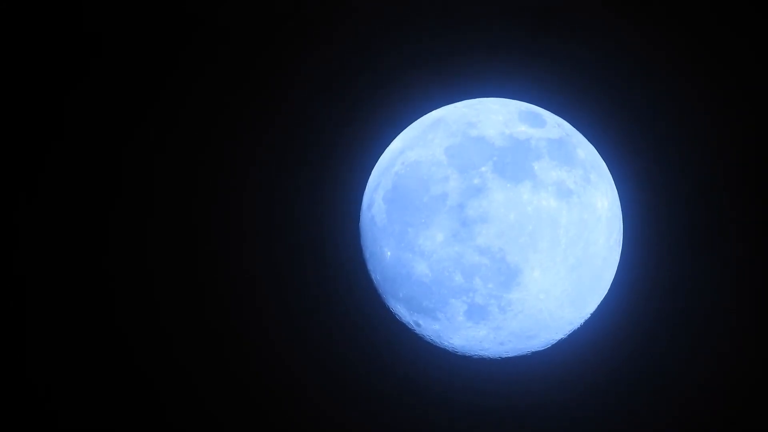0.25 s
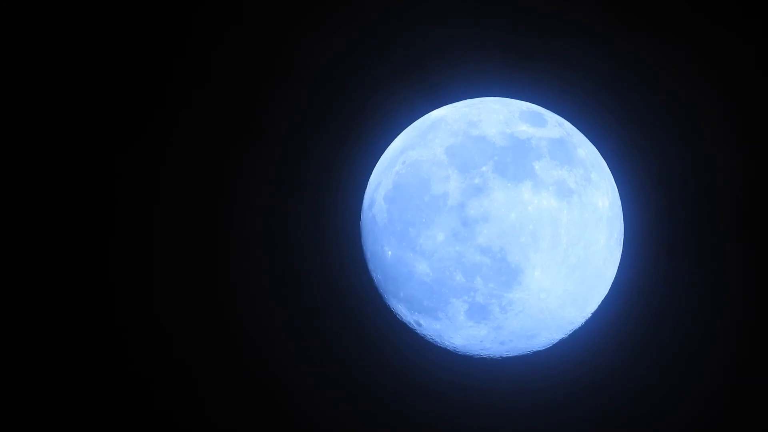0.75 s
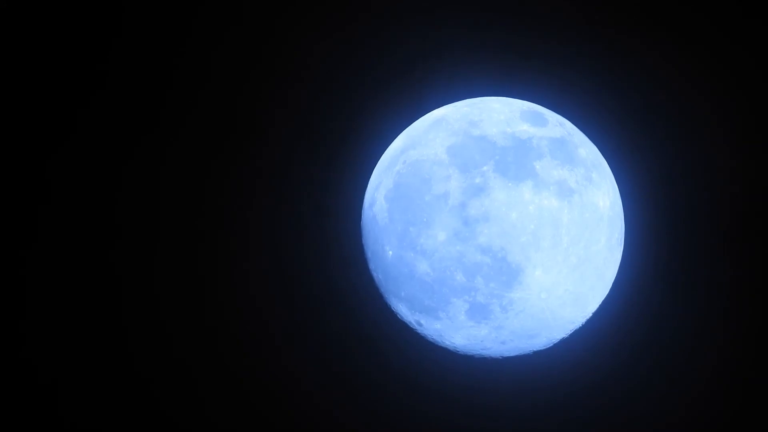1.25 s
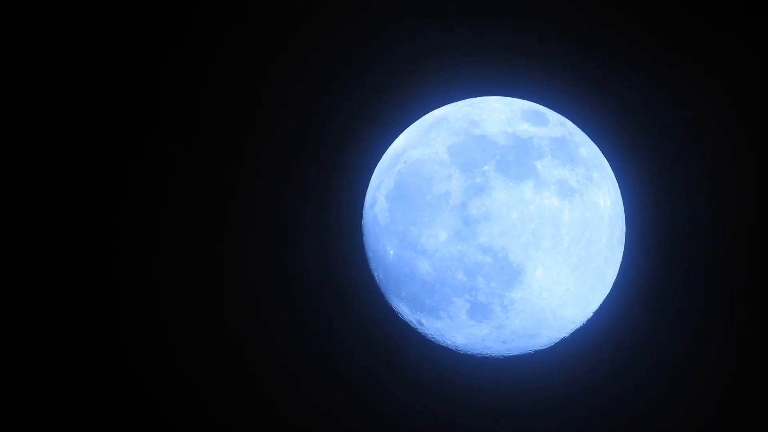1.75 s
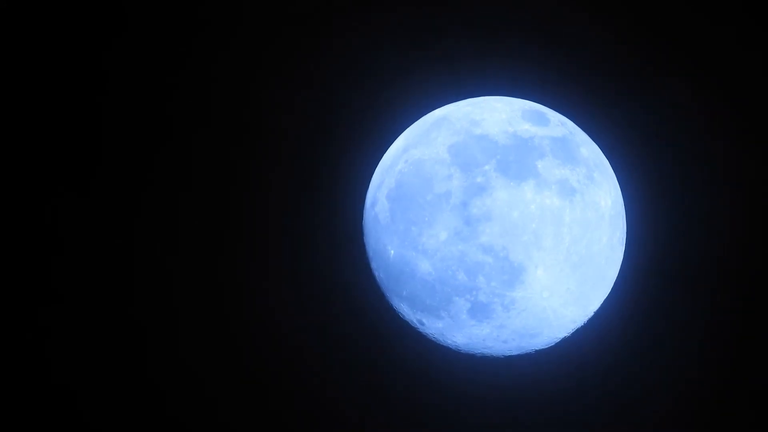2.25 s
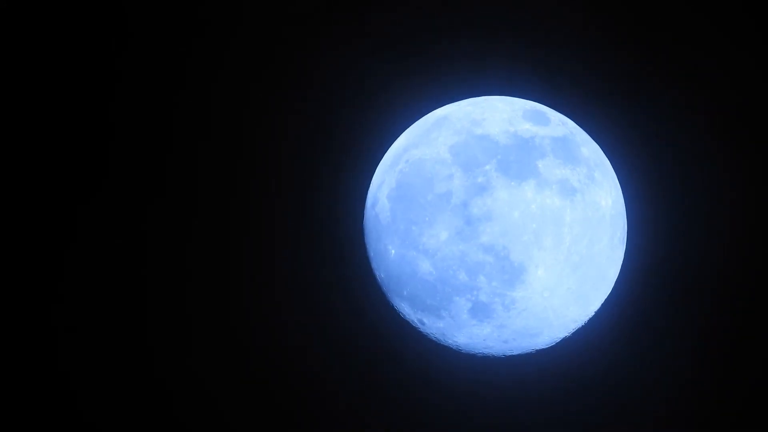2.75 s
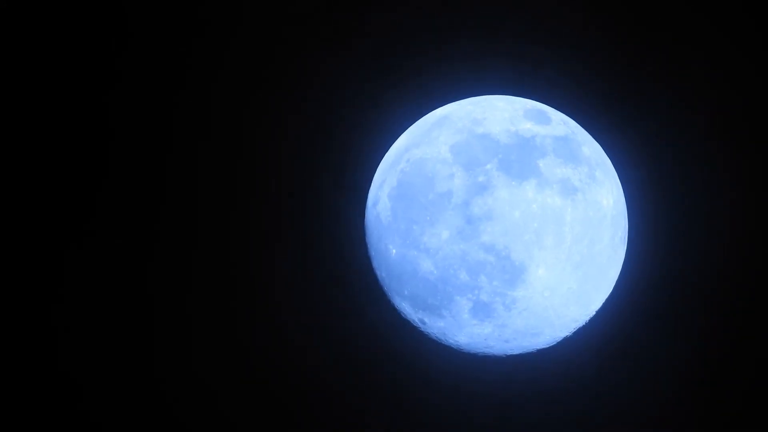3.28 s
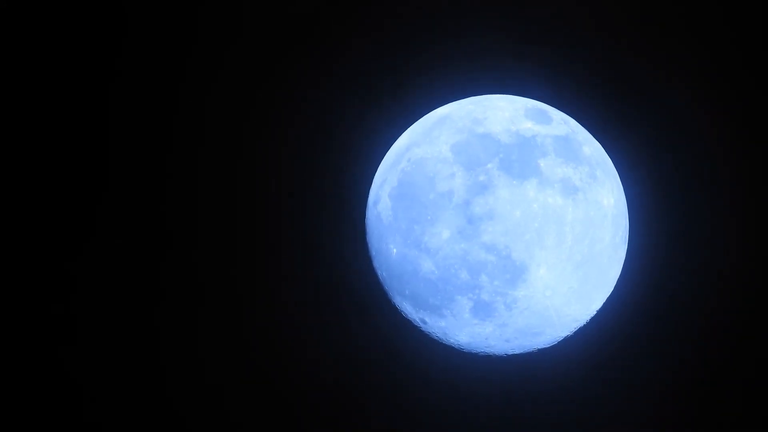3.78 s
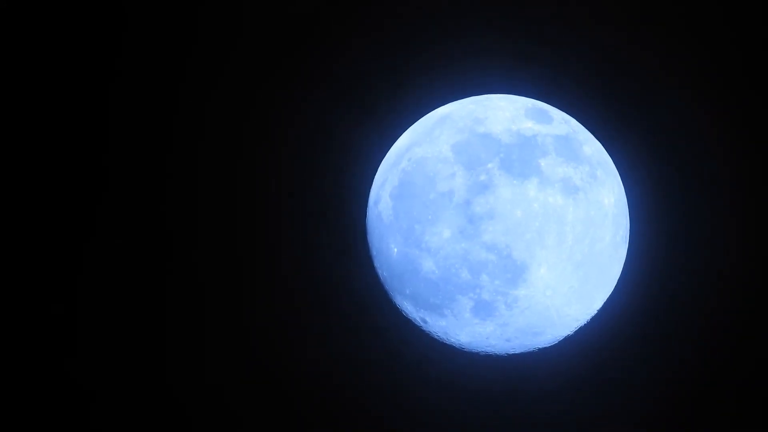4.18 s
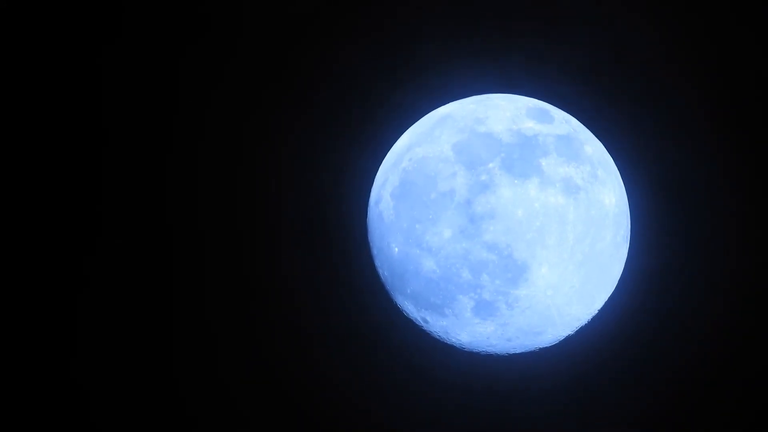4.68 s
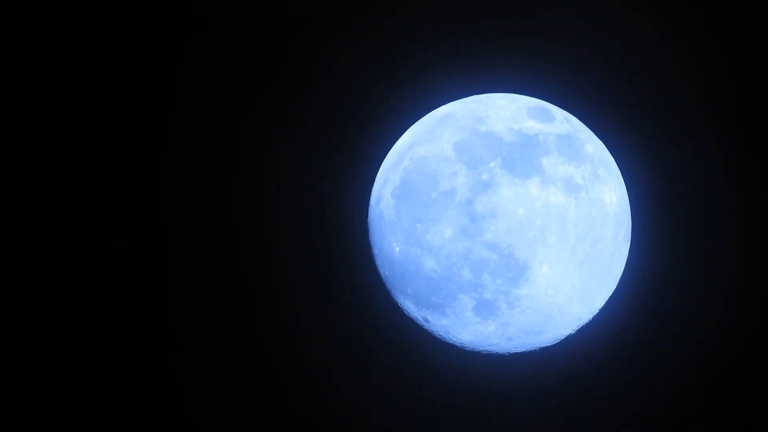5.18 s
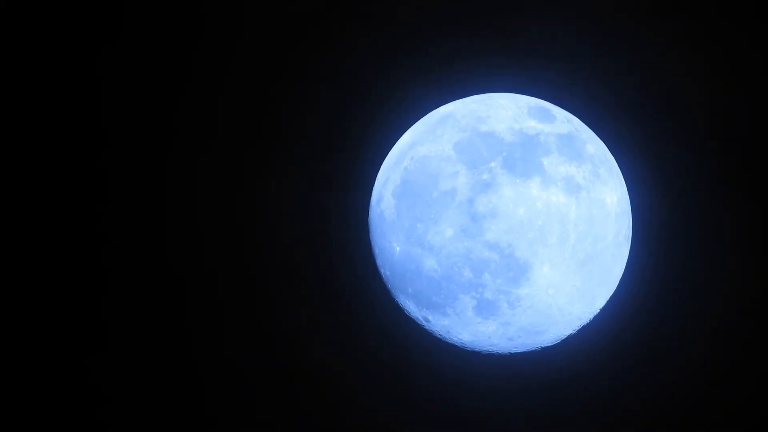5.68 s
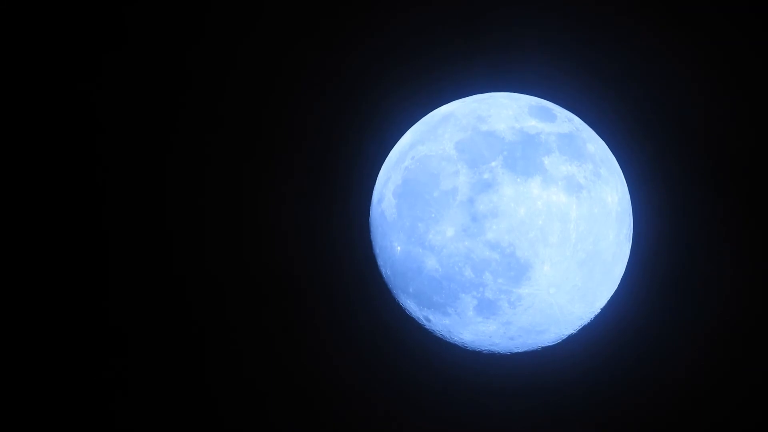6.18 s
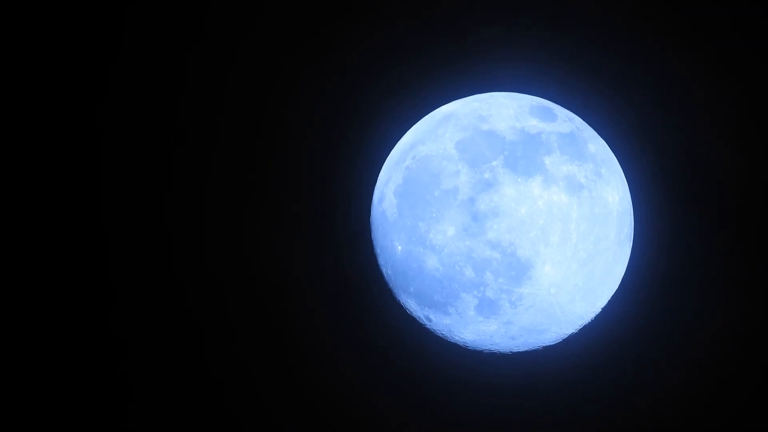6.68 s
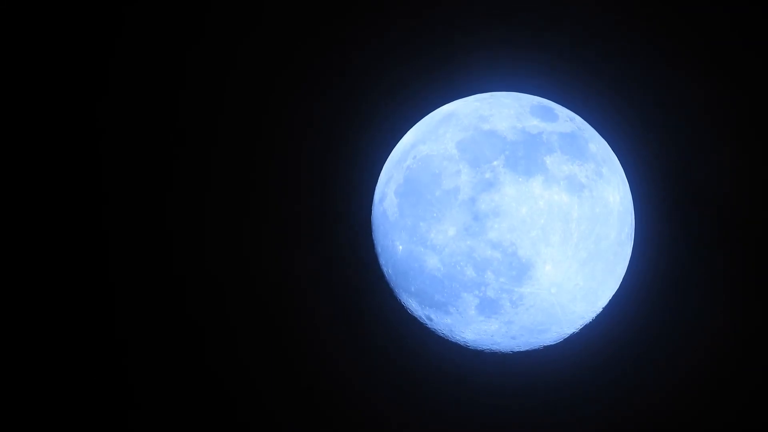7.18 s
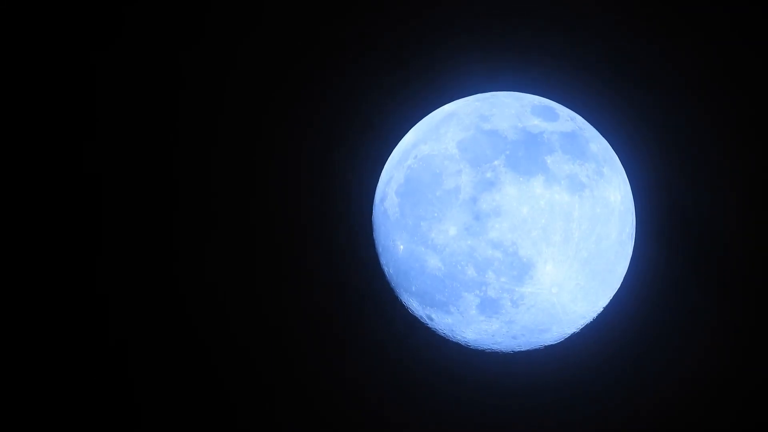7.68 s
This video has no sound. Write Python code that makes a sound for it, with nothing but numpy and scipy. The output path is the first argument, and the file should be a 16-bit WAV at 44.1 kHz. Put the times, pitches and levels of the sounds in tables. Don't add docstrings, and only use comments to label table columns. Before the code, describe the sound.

A loud, near, almost pure-toned cricket trill repeats throughout, slightly uneven in length, with faint echoes off trees. Behind it run rapid high ticks, paired chirps that pause around four seconds and again past seven, and scratchy katydid buzz that gently swells. Soft night air and far tyre hum lie underneath; the hum nearly drops away mid-way, then returns. Open field, wide stereo, very quiet surroundings.

```python
import sys
import numpy as np
from scipy import signal
from scipy.fft import rfft, irfft
from scipy.io import wavfile
from scipy.ndimage import uniform_filter1d

SR = 44100
rng = np.random.default_rng(int(sys.argv[2]) if len(sys.argv) > 2 else 0)


def undo_db(level):
    steps = np.asarray(level, float) / 20
    return 10 ** steps


def to_wav(sig):
    pcm = np.clip(np.atleast_2d(sig), -1, 1) * 32767
    pcm = np.round(pcm).astype(np.int16)
    wavfile.write(sys.argv[1], SR, pcm.T)


N = 349713


def evened(x):
    return x / np.sqrt(np.mean(x ** 2) + 1e-20)


def hiss():
    return rng.standard_normal(N)


def read(points, hz):
    f, value = np.transpose(points)
    return np.interp(np.log(hz + 1), np.log(f + 1), value)


def curve(table, column):
    rows = np.array(table)
    return np.interp(np.arange(N) / SR, rows[:, 0], rows[:, column])


def add(mix, s, sound):
    at = round(s * SR)
    part = mix[max(at, 0):max(at + len(sound), 0)]
    part += sound[max(-at, 0):][:len(part)]


def band(x, lo_hz, hi_hz):
    return signal.sosfilt(signal.butter(N=2, Wn=[lo_hz, hi_hz], btype="band", fs=SR, output="sos"), x)


def place(x, left_db, lag_ms):
    hz = np.fft.rfftfreq(N, 1 / SR)
    late = irfft(rfft(x) * np.exp(-2j * np.pi * hz * lag_ms / 1000), N)
    return np.array([x * undo_db(left_db / 2), late * undo_db(-left_db / 2)])


def resonate(x, hz, width):
    turn = np.exp(2j * np.pi * hz * np.arange(len(x)) / SR)
    r = np.exp(-np.pi * width / SR)
    smooth = signal.lfilter([1], np.poly([r, r]), x / turn)
    return evened((turn * smooth).real)


def bed(spectrum, same, left, patchy_db):
    frames, hz = N // 256 + 5, np.fft.rfftfreq(1024, 1 / SR)
    a, b, c, d, patches = rng.standard_normal((frames, 513, 5)).T
    patches = uniform_filter1d(patches, size=10, axis=0)
    patches = evened(uniform_filter1d(patches, size=20, axis=1))
    like = np.clip(read(same, hz), -1, 1)[:, None]
    shared, own = a + 1j * b, c + 1j * d
    z = np.array([shared, like * shared + np.sqrt(1 - like ** 2) * own])
    side_db = np.array([[.5], [-.5]]) * read(left, hz)
    z *= undo_db((read(spectrum, hz) + side_db)[:, :, None] + patchy_db * patches)
    return evened(signal.istft(z, nperseg=1024, noverlap=768)[1][:, :N])


def field(x, t60, wet_db):
    t = np.arange(SR // 2) / SR
    tail = rng.standard_normal((2, len(t))) * undo_db(-60 * t / t60) * np.minimum(t / 0.0014, 1)
    tail /= np.linalg.norm(tail[0])
    return undo_db(wet_db) * signal.fftconvolve(x[None], tail, axes=1)[:, :N]


# (frequency [Hz], level [dB per Hz])
AIR_COLOUR = [(30, 5.5), (60, -6.5), (120, -15), (160, -15.5), (215, 4), (270, -0.5), (340, 1), (500, -0.5),
              (900, -8), (1300, -8), (2200, -17.5), (2950, -23), (3500, -29), (4600, -47.5)]
# (frequency [Hz], likeness [0-1])
AIR_LIKENESS = [(30, 0.59), (100, 0.7), (200, 0.97), (500, 0.71), (1200, 0.21), (2000, 0.63), (3200, 0.12)]
# (frequency [Hz], left over right [dB])
AIR_LEAN = [(120, -3.5), (200, 1), (400, 0.5), (1200, 0), (2400, 5), (3500, -9)]


def night_air():
    return undo_db(-53.5) * bed(AIR_COLOUR, AIR_LIKENESS, AIR_LEAN, 1.3)


# (frequency [Hz], level [dB per Hz])
CHORUS_COLOUR = [(3000, -54), (3900, -31), (4250, -22.5), (4650, -9.5), (5000, -6.5), (5270, 0), (5550, -7),
                 (5880, -13), (6250, -3.5), (6750, -2.5), (7300, -0.5), (7850, -5.5), (8400, -17.5),
                 (9100, -33.5)]
# (frequency [Hz], likeness [0-1])
CHORUS_LIKENESS = [(4500, 0.33), (5800, 0.13), (6700, 0.32), (7500, 0.78), (8500, 0.78)]
# (frequency [Hz], left over right [dB])
CHORUS_LEAN = [(4000, -6.5), (5000, -6.5), (5800, -2.5), (7000, -3), (8500, -0.5)]


def far_chorus():
    return undo_db(-51.5) * bed(CHORUS_COLOUR, CHORUS_LIKENESS, CHORUS_LEAN, 0.92)


# (start [s], end [s], hum [dB], octave [dB], broad share [0-1])
HUM_TIMES = [(0.0, 0.42, -56.5, -63, 0.47), (0.42, 1.5, -55, -54, 0.69), (1.5, 2.251, -49.5, -54, 0.87),
             (2.248, 2.613, -52.5, -54.5, 0.72), (2.623, 3.65, -54, -64.5, 0.8),
             (4.502, 5.197, -61.5, -54.5, .4), (5.204, 6.05, -54, -52, 0.13),
             (6.424, 6.614, -62, -50.5, 0.2), (6.623, 7.0, -53, -53, 0.26), (6.997, 7.72, -49, -53.5, 0.11),
             (7.721, 8.3, -55, -52, 0.5)]


def hum_spells(edge_s=0.16, rest_db=-62.5, rest_broad=0.93):
    t = np.arange(N) / SR
    start, end, hum_db, octave_db, broad = np.array(HUM_TIMES).T[:, :, None]
    on = np.clip((t - start) / edge_s + .5, 0, 1) * np.clip((end - t) / edge_s + .5, 0, 1)
    gains = [np.sqrt((on * undo_db(db) ** 2).sum(0) + undo_db(rest_db) ** 2) for db in (hum_db, octave_db)]
    return gains, np.clip(rest_broad + (on * (broad - rest_broad)).sum(0), 0, 1)


def tyre_hum(hum_hz=336.4):
    gains, broad = hum_spells()
    waver = 0.65 * evened(resonate(hiss(), 0, 4.9))
    turns = 2 * np.pi * hum_hz * np.arange(N) / SR + waver
    out = np.zeros((2, N))
    for k, left_db in ((1, 7), (2, 10.5)):
        clean = np.sqrt(2) * np.sin(k * turns)
        clean = 0.78 * clean + (.3 + .12 * k) * resonate(hiss(), k * hum_hz, k * 14)
        wide = resonate(hiss(), k * hum_hz * 1.0035, k * 55)
        blend = np.sqrt(1 - broad) * clean + np.sqrt(broad) * wide
        out += place(blend * gains[k - 1], left_db, 0.25)
    return out


# (middle [s], half length [s], level [dB])
WHINE_SWELLS = [
    (1.05, 0.32, -60),
    (2.75, .15, -62),
    (5.1, .2, -62),
    (7.2, 0.26, -55),
]


def tyre_whine():
    t = np.arange(N) / SR
    gain = undo_db(-65) + sum(undo_db(db) * np.exp(-((t - s) / half) ** 2) for s, half, db in WHINE_SWELLS)
    return place(resonate(hiss(), 1310, 170) * gain * undo_db(-2.5), 5.1, 0.12)


# (frequency [Hz], level [dB per Hz])
ROAR_COLOUR = [(150, -26.5), (300, -10.5), (600, -6.5), (750, 0.5), (950, 0), (1120, -8.5), (1600, -20.5),
               (2300, -34.5)]
# (time [s], level [dB])
ROAR_LEVEL = [(0, -55), (0.4, -52), (1.9, -51.5), (2.6, -56), (4.1, -56), (5.1, -52.5), (7.3, -51),
              (7.7, -51.5), (7.93, -54)]


def road():
    roar = bed(ROAR_COLOUR, [(300, 1.0), (1500, .85)], [(300, 0.0014), (1500, 0.01)], 1.16)
    roar = place(roar[0], 8.1, 0.14) + .15 * roar[1]
    return tyre_hum() + tyre_whine() + undo_db(curve(ROAR_LEVEL, 1) + 1.0) * roar


def far_cricket(hz=2980, db=-70):
    throb_db = 2.6 * evened(uniform_filter1d(hiss(), size=1500))
    call = evened(resonate(hiss(), hz, 400) * undo_db(throb_db)) * undo_db(db)
    return place(call, -1.2, 0.014) + field(call, 0.24, -1.5)


# (strokes per second [1/s], start pitch [Hz], end pitch [Hz], stroke [ms], left over right [dB], right lag [ms])
KATYDID_WINGS = [
    (62.2, 4950, 5600, 6, -4, .003),
    (98.7, 8250, 7180, 6.6, -1.1, -.011),
    (106.4, 8300, 7220, 6.6, -1.2, -.012),
]
# (mean level [dB], swing [dB], cycle [s], loudest at [s])
KATYDID_SWELLS = [
    (-66, 4.5, 14, 6.5),
    (-63, 3, 2.9, 0.75),
    (-63.5, 3.8, 2.65, 1.6),
]


def katydids(rough=.35, wet_db=-4.5, boost_db=.8):
    out, t = np.zeros((2, N)), np.arange(N) / SR
    for wings, (db, swing_db, cycle, top) in zip(KATYDID_WINGS, KATYDID_SWELLS):
        rate, start_hz, end_hz, ms, left_db, lag_ms = wings
        count = 2 + rate * t + .06 * evened(uniform_filter1d(hiss(), size=9000))
        along = np.minimum((count % 1) / rate * 1000 / ms, 1)
        hz = start_hz + (end_hz - start_hz) * along
        start = rng.random(1000)[count.astype(int)]
        tone = np.sin(2 * np.pi * (np.cumsum(hz) / SR + start))
        scratch = 1 + rough * evened(uniform_filter1d(hiss(), size=50))
        buzz = evened(tone * scratch * np.sin(np.pi * along) ** 2)
        swell_db = db + swing_db * np.cos(2 * np.pi * (t - top) / cycle)
        buzz *= undo_db(swell_db + boost_db)
        out += place(buzz, left_db, lag_ms) + field(buzz, 0.44, wet_db)
    return out


def note(shape, phase, stretch, overtone_db):
    ms, db, hz = np.transpose(shape)
    t = np.arange(ms[0], ms[-1], 1000 / SR / stretch)
    turns = phase + 2 * np.pi * np.cumsum(np.interp(t, ms, hz)) / SR
    swell = uniform_filter1d(undo_db(np.interp(t, ms, db)), size=40)
    swell *= signal.windows.tukey(len(t), .15)
    return ms[0] / 1000, np.sqrt(2) * swell * (np.sin(turns) + undo_db(overtone_db) * np.sin(2 * turns))


def repeats(runs, every_s):
    events = []
    for first, last, db in runs:
        count = round((last - first) / every_s) + 1
        events += [(s, db) for s in np.linspace(first, last, count)]
    return events


def caller(events, shape, left_db, lag_ms, wet_db, boost_db, wobble_s, wobble_db):
    out, chance = np.zeros(N), rng.standard_normal((len(events), 4))
    for (s, db), (phase, stretch, late, strong) in zip(events, chance):
        lead, sound = note(shape, 10 * phase, 1 + 0.076 * stretch, -60)
        add(out, s + lead + wobble_s * late, sound * undo_db(db + boost_db + wobble_db * strong))
    return place(out, left_db, lag_ms) + field(out, 0.24, wet_db)


# (time [ms], level [dB], pitch [Hz])
TICK_STROKE = [(-17, -25, 7115), (-12, -3, 7105), (-6, -2.5, 7098), (-1, -9, 7095), (4, -4, 7095),
               (8, -1, 7085), (11, -1, 7060), (15, -12, 7030), (18, -25, 7020)]
# (middle of first note [s], middle of last note [s], level [dB])
TICKER_RUNS = [
    (.076, .684, -47.5),
    (.787, 1.301, -49),
    (1.406, 2.374, -46.5),
    (2.478, 3.407, -49.5),
    (3.51, 4.562, -50.5),
    (4.66, 5.394, -49),
    (5.497, 6.523, -48.5),
    (6.629, 6.844, -51),
    (6.944, 7.877, -46.5),
]


def ticker():
    ticks = repeats(TICKER_RUNS, every_s=.104)
    return caller(ticks, TICK_STROKE, -2.7, 0.023, -4.5, -0.2, .002, 1.3)


# (time [ms], level [dB], pitch [Hz])
PAIR_STROKE = [(-16, -25, 6410), (-12, -6, 6440), (-4, -1, 6455), (2, 0, 6430), (7, -1.5, 6360),
               (11, -3.5, 6285), (14, -10, 6220), (17, -25, 6180)]
# (first pair [s], last pair [s], level [dB])
CHIRP_BOUTS = [
    (-0.005, 3.636, -50.5),
    (4.278, 7.059, -49.5),
    (7.826, 8.0, -50),
]


def pair_chirper(gap_s=.044):
    firsts = repeats(CHIRP_BOUTS, every_s=.1735)
    pairs = firsts + [(s + gap_s, db - .5) for s, db in firsts]
    return caller(pairs, PAIR_STROKE, -2.5, 0.0061, -2.7, -3.5, 0.0023, 0.99)


# (first stroke [s], last stroke [s], level [dB], first stroke against the rest [dB])
CRICKET_TRILLS = [(-0.083, 0.02, -37.5, -3), (0.15, 0.482, -37.5, -1.5), (0.622, 0.9344, -37.5, -2),
                  (1.1042, 1.4987, -38, -1), (1.609, 1.9429, -38, 0), (2.0488, 2.3192, -38, -1),
                  (2.4232, 2.715, -38, -.6), (2.856, 3.147, -38, -1), (3.254, 3.65, -38.5, -0.5),
                  (3.8265, 4.306, -38.5, -1), (4.5747, 4.595, -38, -1.5), (4.637, 4.9278, -38, -1),
                  (5.0607, 5.351, -38, -1), (5.516, 6.0162, -38.5, -0.5), (6.181, 6.4286, -38, -1.5),
                  (6.574, 6.822, -38, -1.5), (6.9573, 7.3307, -38.5, -1.5), (7.458, 7.623, -38, -1.5),
                  (7.871, 7.9126, -38.5, -5)]
# (time [ms], level [dB], pitch [Hz])
CRICKET_STROKE = [(-2.5, -26.5, 2725), (-1.5, -19.5, 2680), (0.5, -6.5, 2712), (2, -1.5, 2663),
                  (5.5, 0.5, 2636), (7, 0.5, 2554), (10.5, -1.5, 2561), (12.5, -10, 2504),
                  (19.5, -30.5, 2530)]
# (time [s], level [dB])
BROKEN_STROKE = (4.6185, -56)
# (delay [s], level [dB], left over right [dB])
TRUNK_ECHOES = [
    (0.013, -23, -0.5),
    (.047, -24.5, 5.5),
    (.059, -25.5, 1),
    (0.074, -33.5, 3.5),
    (.13, -32.5, -6),
]


def cricket(ring_hz=2608, period=.02075, jitter=0.00026):
    out = np.zeros(N)
    for first, last, db, first_db in CRICKET_TRILLS:
        k = np.arange(round((last - first) / period) + 1)
        paced = np.cumsum(1 - .05 * np.exp(-k / 2.8) + 0.00064 * k)
        times = first + (last - first) * (paced - paced[0]) / (paced[-1] - paced[0])
        chance = rng.standard_normal((30, 4))
        walk = np.cumsum(1.1 * chance[:, 0] + 1.6 * chance[-1, 1])
        for i, s in enumerate(times + jitter * chance[k, 1]):
            phase = 2 * np.pi * ring_hz * s + walk[i]
            lead, sound = note(CRICKET_STROKE, phase, 1 + 0.024 * chance[i, 2], -33.0)
            add(out, s + lead, sound * undo_db(db + .5 * chance[i, 3] + first_db * (i == 0)))
    lead, sound = note([(0, -11, 2820), (2, 2, 2860), (6, -8, 2700), (8, -14, 2725)], 0, 1, -40)
    add(out, BROKEN_STROKE[0], sound * undo_db(BROKEN_STROKE[1]))
    out = band(out, 2473, 3150)
    core = band(out, 2563, 2628)
    echoes = np.zeros((2, N))
    for s, db, left_db in TRUNK_ECHOES:
        late = np.pad(core, (round(s * SR), 0))[:N]
        echoes += place(late * undo_db(db), left_db, 0)
    return place(out, 1.6, 0) + echoes + field(out, .5, -22.0)


def scene():
    background = night_air() + far_chorus() + road()
    return background + far_cricket() + katydids() + ticker() + pair_chirper() + cricket()


def top_cut(x):
    return signal.sosfilt(signal.butter(12, 9410, fs=SR, output="sos"), x)


def record(dry):
    thin = signal.sosfilt(signal.butter(N=3, Wn=175, btype="high", fs=SR, output="sos"), dry)
    edge = signal.firwin(1601, 8945, window=("kaiser", 9), fs=SR)
    mix = signal.oaconvolve(thin, edge[None], "same")
    return top_cut(mix)


dry = scene()
out = record(dry)
to_wav(out)
```